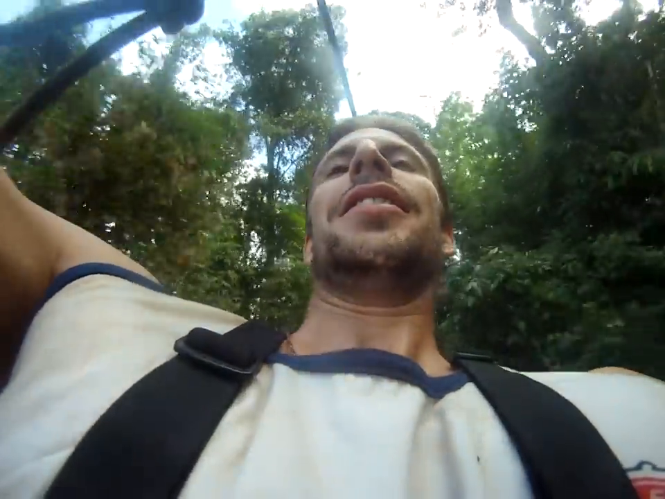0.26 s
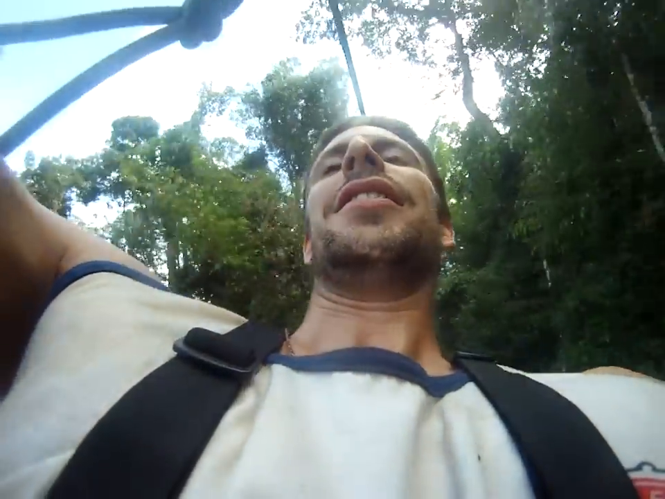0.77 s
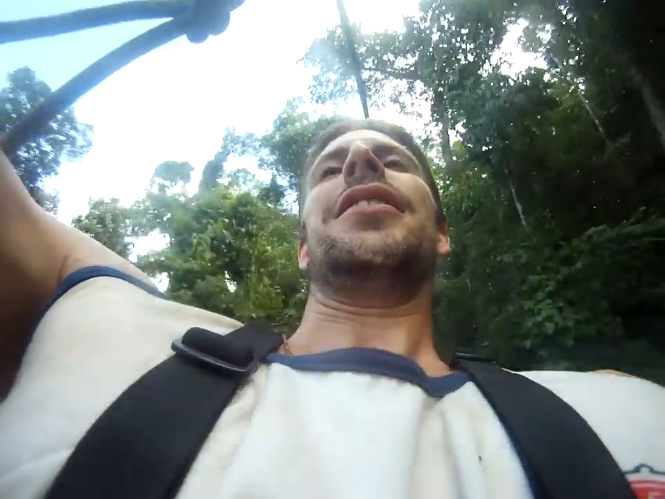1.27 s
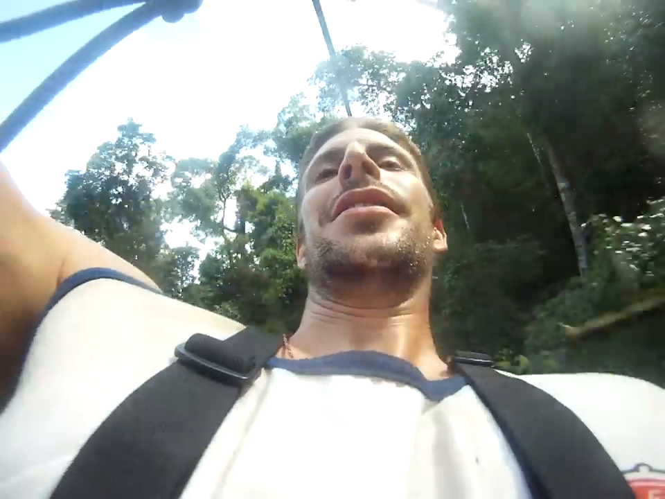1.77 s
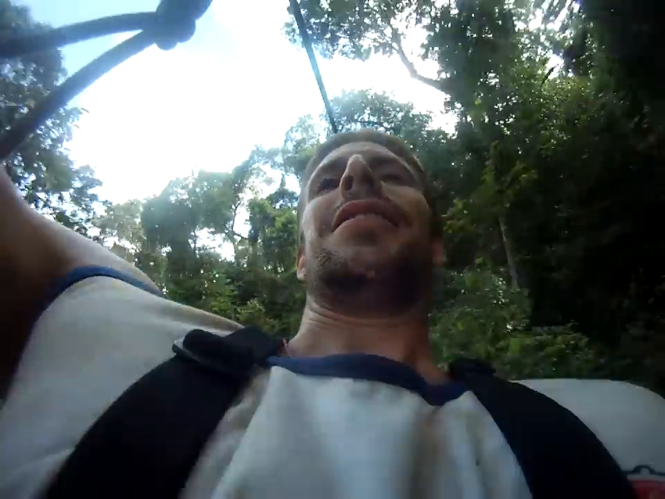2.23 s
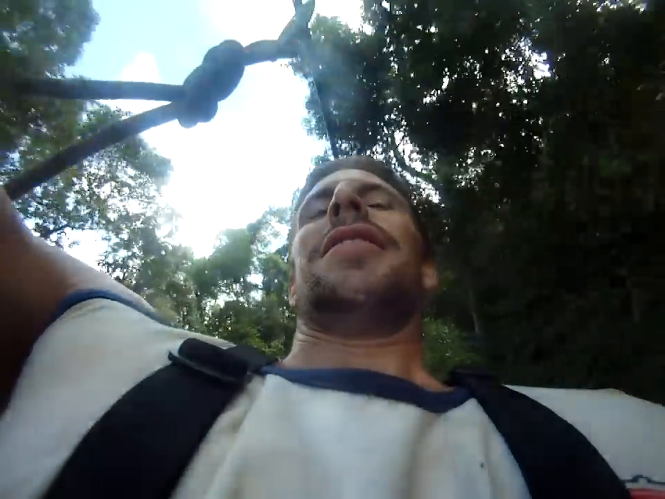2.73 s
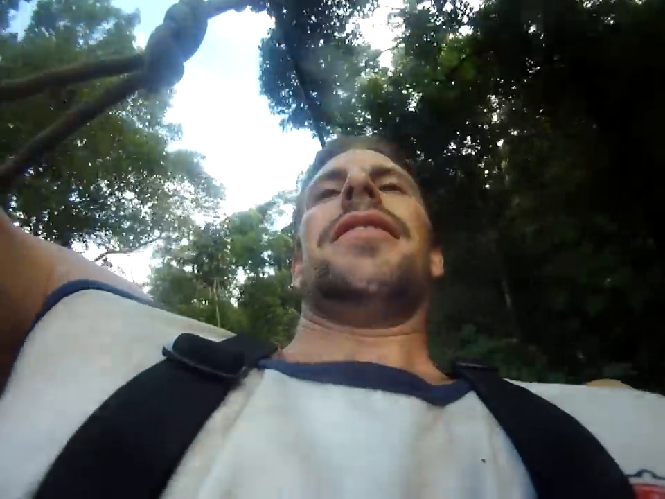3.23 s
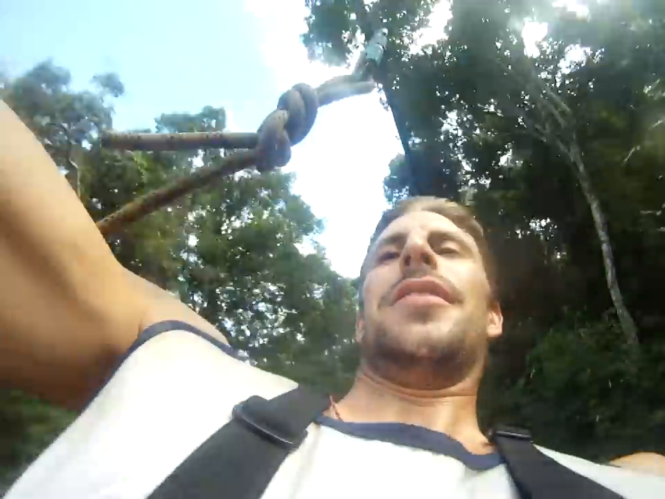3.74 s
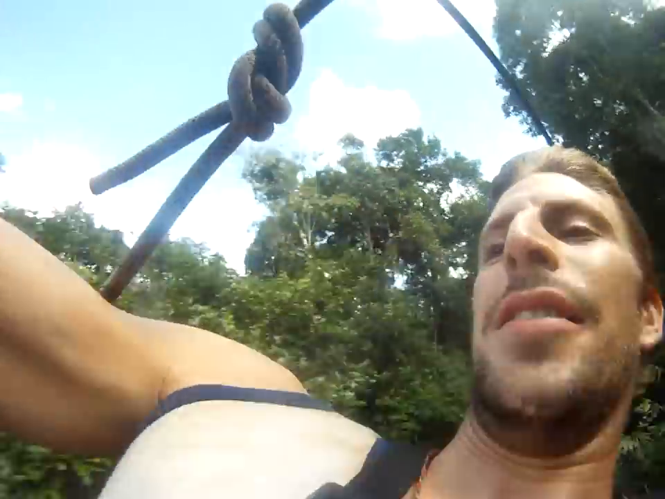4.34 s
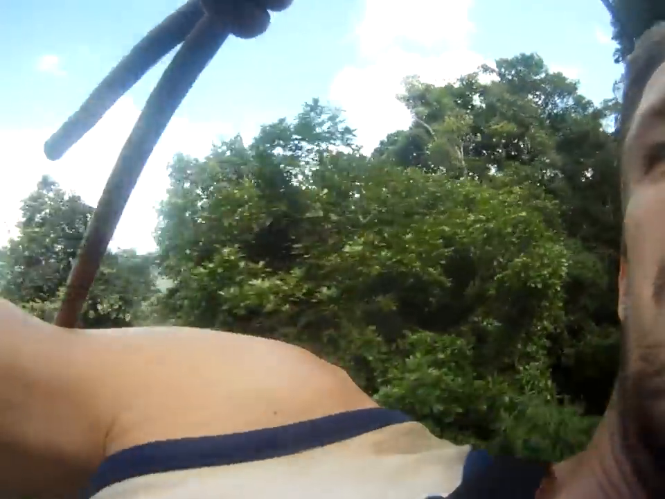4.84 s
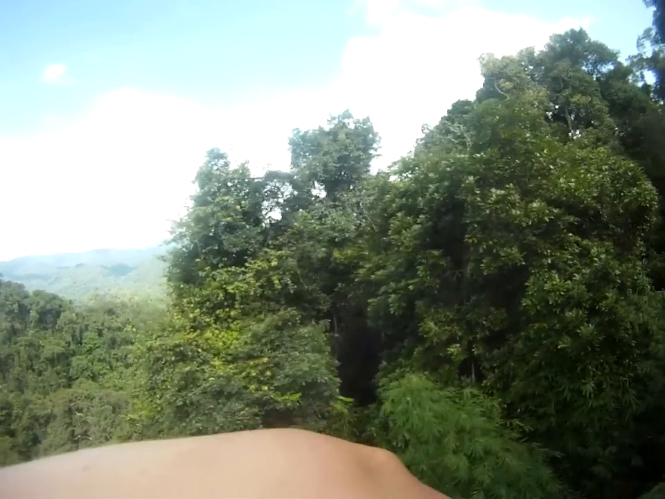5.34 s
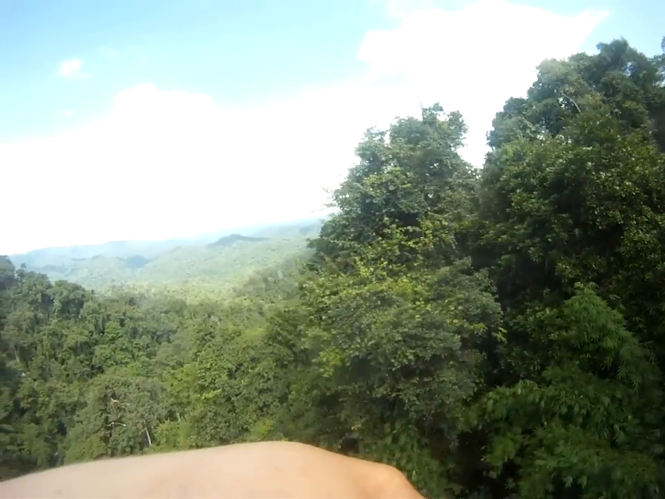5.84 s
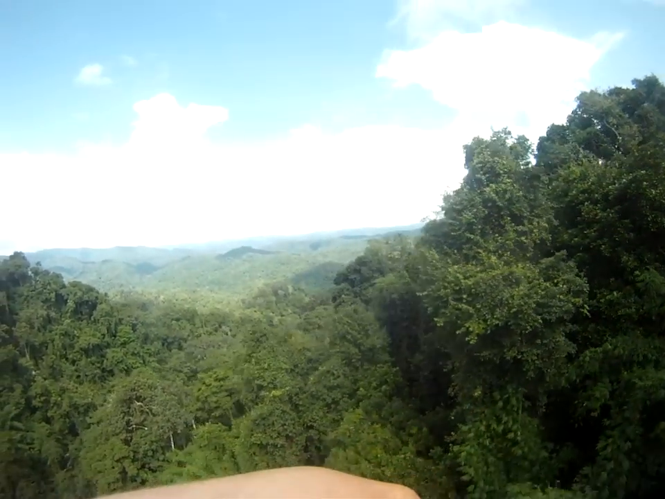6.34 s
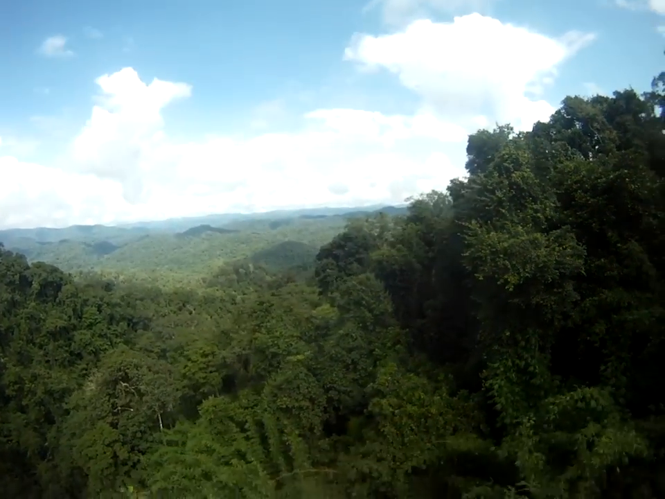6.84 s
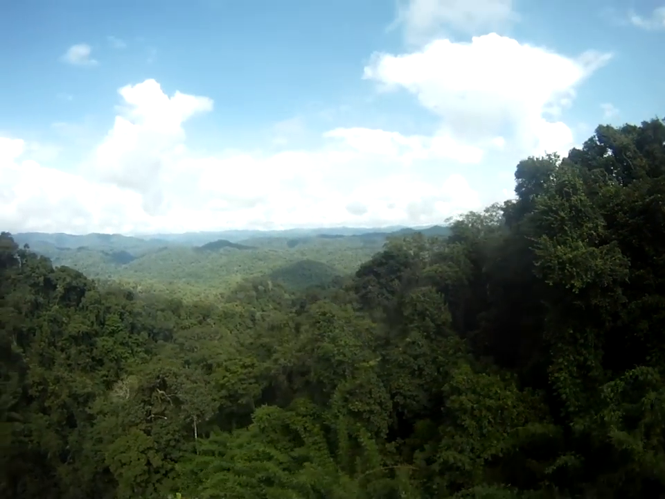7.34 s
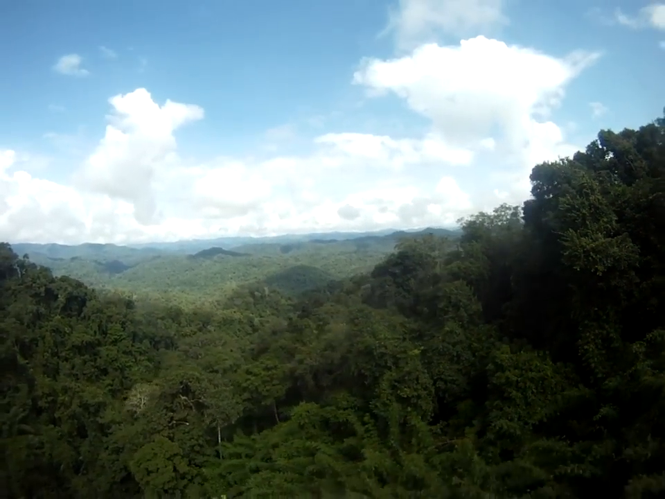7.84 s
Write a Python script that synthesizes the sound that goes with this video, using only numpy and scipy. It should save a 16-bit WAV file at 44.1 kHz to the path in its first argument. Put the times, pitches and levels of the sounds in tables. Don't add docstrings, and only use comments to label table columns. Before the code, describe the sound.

A pulley trolley whirs down a steel cable, its metallic whine climbing steadily, with wind rumbling on the microphone and sharp handling snaps midway.

```python
import sys
import numpy as np
from scipy import signal
from scipy.io import wavfile

SR = 44100
rng = np.random.default_rng(int(sys.argv[2]) if len(sys.argv) > 2 else 0)


def invert_db(x):
    u = np.asarray(x, float) / 20
    return 10 ** u


def file_out(sig):
    cols = np.atleast_2d(sig).T
    lim = np.clip(cols, -1, 1)
    pcm = np.round(lim * 32767).astype(np.int16)
    wavfile.write(sys.argv[1], SR, pcm)


N = 357210

# start_s, away (0 facing to 1 away)
TURN_AWAY = [(0, 0.05), (2, 0.057), (2.3, 0.13), (2.8, .1), (3.3, .2), (3.7, 0.69), (5.4, 1), (6, 1),
             (7, 0.66), (8.1, 0.53)]


def rolling(lay_turns, levels):
    # pitch_hz, width_hz, facing_db, away_db
    frame_modes = [(1499, 374, -4, -4.5), (1854, 240, -4.5, 0.5), (2050, 190, -24.5, 6),
                   (2282, 230, 2, 1.5), (2537, 70, -4.5, 2.5)]
    # pitch_hz, width_hz, facing_db, away_db
    upper_modes = [(3460, 360, 1.5, -8), (3672, 49, -25, 7), (3880, 170, 4, -7), (4170, 340, -5.5, 4)]
    # pitch_hz, width_hz, facing_db, away_db
    hiss_modes = [(4406, 180, -12.5, -11.5), (4650, 200, -7.5, -6.5), (4932, 150, -8, -7),
                  (5290, 430, -3.5, 2.5), (5666, 290, 4.5, -3)]
    frame_db, ring_hz, ring_db, upper_db, hiss_db = levels
    lay_pulse = 1 + 0.05 * np.cos(2 * np.pi * lay_turns)
    load = lay_pulse * invert_db(0.41 * drift(36) + 0.5 * drift(11.3))
    ring_gain = invert_db(ring_db - 2.0 + 0.36 * drift(31))
    out = ring_gain * wavering_line(np.cumsum(ring_hz) / SR, steady=0, blur_hz=192, swell_db=0) * load
    for modes, level_db in ((frame_modes, frame_db - 0.5), (upper_modes, upper_db + 2.0), (hiss_modes, hiss_db)):
        gain = invert_db(level_db + 0.86 * drift(6))
        out = out + gain * load * resonate(rng.standard_normal(N), modes)
    return out


def singing(whine_hz, strand_hz, levels):
    # start_s, level_db
    whine_knots = [(.05, -29), (.9, -25), (1.1, -34), (1.44, -31), (1.62, -21), (1.85, -29), (2.3, -39),
                   (2.7, -34), (3.5, -26), (3.9, -46), (4.8, -39), (5.2, -30), (5.66, -24), (5.9, -32),
                   (6.66, -30), (7.15, -34), (7.7, -25), (7.85, -38)]
    strong_multiples = [22, 24, 25, 27, 28]
    strong_rest_db = [-40, -34, -32, -36, -42]
    # centre_s, length_s, change_db
    strong_flares = [
        [(.05, .12, 11), (1.4, .35, 12), (2.07, .3, 20), (2.5, .12, 13), (3.2, .3, 14), (4.3, .1, 9),
         (7.45, .25, 8)],
        [(.68, .15, 12), (1.65, .15, 12), (2.6, .35, 7), (4.1, .3, -8), (5.1, .35, 9), (6.9, .4, 5)],
        [(.55, .3, 13), (2.55, .3, 8), (3.28, .15, 10), (4.0, .42, 16.5), (4.55, .1, 9), (4.95, .2, 8),
         (7.0, .25, -5)],
        [(1.1, .3, 11), (2.6, .27, 15), (3.65, .45, 16), (4.9, .12, 9), (6.2, .25, 7), (7.4, .7, 4)],
        [(2.5, .12, 14), (3.5, .75, 14), (6.1, .1, 8), (7.5, .75, 11)],
    ]
    weak_multiples = [21, 23, 26]
    weak_below_db = [-7, -8, -3]
    _, ring_hz, ring_db, upper_db, _ = levels
    whine_db, = joined([whine_knots])
    strong_db = [rest_db + swells(rows) for rest_db, rows in zip(strong_rest_db, strong_flares)]
    slipping_hz = strand_hz * (1 + 0.0025 * drift(2.5))
    lay_turns = np.cumsum(slipping_hz) / SR
    out = invert_db(whine_db) * wavering_line(np.cumsum(whine_hz) / SR, steady=0.8, blur_hz=7, swell_db=0)
    for multiple, level_db in zip(strong_multiples, strong_db):
        out = out + invert_db(level_db) * wavering_line(multiple * lay_turns, steady=0.5, blur_hz=23, swell_db=1.5)
    for multiple, below_db in zip(weak_multiples, weak_below_db):
        line_hz = multiple * strand_hz
        near = invert_db(ring_db) / (1 + ((line_hz - ring_hz) / 170) ** 2)
        near = near + invert_db(upper_db + 0.5) / (1 + ((line_hz - 3650) / 220) ** 2)
        line = wavering_line(multiple * lay_turns, steady=0.48, blur_hz=23, swell_db=2)
        out = out + near * invert_db(below_db) * line
    return out


def roll_levels(whine_hz):
    # start_s, load_db, grit_db (at the port)
    load_knots = [(0, -20.5, -25), (.6, -17.5, -22.5), (1.24, -23, -24), (1.72, -19, -23.5),
                  (2, -21.5, -25), (2.3, -18, -18.5), (2.7, -22, -23), (3.25, -19, -22.5), (3.8, -24, -19),
                  (4.5, -21, -15.5), (5, -19.5, -19), (5.25, -23, -18), (5.45, -22, -28), (5.95, -24, -27),
                  (6.7, -16.5, -21), (7.12, -17.5, -25), (7.61, -15.5, -21), (8.1, -18.5, -23)]
    # centre_s, length_s, change_db
    hand_shade = [
        (4.45, .3, -10),
        (5.3, .15, -4),
        (8.1, .2, 3),
    ]
    ring_facing_hz, ring_away_hz = 3075, 2825
    frame_facing_db, frame_away_db = -26, -28.5
    rest_db, peak_db = -31, 8
    best_hz, rise_hz, fall_hz = 1760, 130, 35
    load_db, grit_db = joined([load_knots])
    load_change_db, grit_change_db = load_db - load_db.mean(), grit_db - grit_db.mean()
    away = np.clip(joined([TURN_AWAY])[0], 0, 1)
    turned = 0.5 + 0.5 * np.tanh((away - 0.45) / 0.12)
    ring_hz = ring_facing_hz + (ring_away_hz - ring_facing_hz) * turned + 12 * drift(2.5)
    frame_db = frame_facing_db + (frame_away_db - frame_facing_db) * turned
    frame_db = frame_db + 0.25 * load_change_db + 0.35 * grit_change_db
    detune = (whine_hz - best_hz) / np.where(whine_hz < best_hz, rise_hz, fall_hz)
    upper_db = rest_db + peak_db * np.exp(-detune ** 2) + 0.3 * grit_change_db + swells(hand_shade)
    return frame_db, ring_hz, load_db, upper_db, grit_db


def handling():
    # start_s, peak_db, pitch_hz, t60_s, rattle (0-1)
    snaps = [(4.4322, 6, 2300, 0.022, 0.5), (4.4353, 22, 3670, 0.01, 0.11),
             (4.4374, 9.5, 2140, 0.014, 0.36), (4.4317, -20, 1490, 0.0098, 0.1),
             (4.6259, 15.5, 3620, 0.0062, 0.05), (4.6267, 17, 2260, 0.012, 0.16),
             (4.6268, 5, 780, 0.013, 0.1), (5.0189, 10.5, 2180, 0.011, 0.32), (5.0189, -2, 900, 0.012, 0.9),
             (5.0192, 8, 1500, .009, .5), (5.0187, -10, 262, 0.027, 0.5), (4.629, -4, 220, 0.023, 0.16),
             (5.4225, 4.5, 292, 0.011, 0.2), (5.4206, 17.5, 3720, 0.009, .12),
             (5.4193, 6, 1940, 0.0083, 0.58), (5.4222, 8, 1095, 0.01, 0.34), (5.4229, 8, 2350, 0.018, 0.7)]
    # start_s, peak_db, pitch_hz, overtone_db
    knocks = [(3.186, -17, 1500, -17), (3.343, -23, 880, -26), (3.354, -21, 740, -30),
              (3.424, -23, 730, -35), (3.471, -27, 735, -30), (3.501, -40, 1100, -23),
              (3.668, -26, 942, -30), (3.758, -22, 1040, -25), (3.958, -25, 940, -35),
              (4.087, -35, 1390, -27), (5.605, -29, 970, -20), (5.908, -7, 1100, -7.5),
              (5.92, -9.5, 1080, -15), (5.932, -16, 1130, -10), (5.951, -15, 966, -11),
              (5.965, -17, 930, -21), (5.996, -14, 925, -15), (6.016, -19, 920, -34),
              (6.041, -32, 484, -25), (6.053, -12, 990, -5), (6.916, -11, 850, -25), (7.051, -25, 570, -17),
              (7.059, -16, 1120, -13), (7.074, -24, 1140, -7), (7.083, -33, 624, -20),
              (7.097, -15.5, 514, -23), (7.16, -34, 923, -19), (7.886, -13.5, 980, -14)]
    # start_s, peak_db
    thumps = [(3.351, -11.5), (3.755, -9.5), (3.955, -7.5), (5.901, -9), (5.913, -12), (5.96, -10),
              (5.97, -5), (6.013, -7.5), (7.08, 0), (7.157, -15.5), (7.883, -8.5)]
    out = np.zeros(N)
    for start_s, peak_db, pitch_hz, t60_s, rattle in snaps:
        strike(out, start_s, peak_db, pitch_hz, t60_s, rattle)
    for start_s, peak_db, pitch_hz, overtone_db in knocks:
        strike(out, start_s, peak_db + 4.5, pitch_hz, t60_s=0.015, rattle=0.35)
        strike(out, start_s, overtone_db + 2.5, 1.9 * pitch_hz, t60_s=0.01, rattle=0.5)
    for start_s, peak_db in thumps:
        strike(out, start_s, peak_db, 110, t60_s=0.04, rattle=0)
    return out


def rubbing():
    # start_s, length_s, level_db
    rubs = [
        (3.2, .22, -42),
        (3.423, 0.06, -38),
        (5.89, 0.02, -34),
        (5.953, 0.03, -27),
        (7.042, 0.056, -22),
        (7.154, 0.028, -30),
    ]
    t = np.arange(N) / SR
    strokes = 0
    for start_s, length_s, level_db in rubs:
        edge_s = np.minimum(t - start_s, start_s + length_s - t)
        strokes = strokes + invert_db(level_db) * np.clip(edge_s / 0.004, 0, 1)
    grains = rng.standard_normal(N) * invert_db(5.0 * drift(150))
    skin = signal.butter(2, [450, 2400], "band", fs=SR, output="sos")
    return strokes * rms_one(signal.sosfilt(skin, grains))


def wind():
    # start_s, level_db
    wind_knots = [(0, -41), (.3, -41), (.7, -40), (1.1, -34.5), (1.66, -37), (2.2, -36.5), (2.5, -39),
                  (3.1, -31), (3.5, -29), (4.25, -33), (4.7, -33), (5.1, -37), (5.35, -31), (5.75, -30),
                  (6.6, -24.5), (7.3, -24.5), (7.7, -29), (8.1, -35)]
    # centre_s, length_s, change_db
    gusts = [(.3, .1, 5), (.66, .1, 6), (1.19, .2, 2), (2.44, .1, -8), (3.3, .15, 9), (3.9, .2, -3),
             (4.97, .1, 5), (5.35, .2, 5), (6.22, .12, 8), (6.37, .04, -10), (6.7, .25, -4),
             (8.02, .15, 13)]
    # pitch_hz, width_hz, facing_db, away_db
    cavity_modes = [(693, 76, -6, -9), (973, 410, 0, 6.5), (460, 900, -7, 1.5), (1190, 230, 0.5, -22)]
    buffet_db, = joined([wind_knots])
    strength_db = buffet_db + 33
    rumble_db = -30.5 + 0.9 * strength_db + swells(gusts)
    rush_db = -43 + 0.5 * strength_db
    white = rng.standard_normal((3, N + SR))
    rumble_band = signal.butter(2, [24, 80], "band", fs=SR, output="sos")
    buffet_band = signal.butter(1, [80, 150], "band", fs=SR, output="sos")
    buffet_top = signal.butter(2, 240, fs=SR, output="sos")
    rumble = signal.sosfilt(rumble_band, white[0])[SR:]
    buffet = signal.sosfilt(buffet_top, signal.sosfilt(buffet_band, white[1]))[SR:]
    buffet = buffet * invert_db(1.73 * drift(11.3))
    rush = resonate(white[2, SR:], cavity_modes) * invert_db(1.1 * drift(23))
    return invert_db(rumble_db) * rms_one(rumble) + invert_db(buffet_db) * rms_one(buffet) + invert_db(rush_db) * rush


def resonate(x, modes):
    away = np.clip(joined([TURN_AWAY])[0], 0, 1)
    out, power = 0, 0
    for k, (pitch_hz, width_hz, facing_db, away_db) in enumerate(modes):
        r = np.exp(-np.pi * width_hz / SR)
        b, a = [1, 0, -0.987], [1, -2 * r * np.cos(2 * np.pi * pitch_hz / SR), r * r]
        gain = invert_db(facing_db + away * (away_db - facing_db))
        shifted = np.roll(x, 7919 * k)
        ring = signal.lfilter(b, a, signal.lfilter(b, a, shifted))
        out = out + gain * rms_one(ring)
        power = power + gain ** 2
    return out / np.sqrt(power)


def wavering_line(turns, steady, blur_hz, swell_db):
    blur = drift(blur_hz) + 1j * drift(blur_hz)
    shape = steady + (1 - steady) * blur
    tone = np.real(shape * np.exp(2j * np.pi * turns))
    return rms_one(tone * invert_db(swell_db * drift(6)))


def strike(out, start_s, peak_db, pitch_hz, t60_s, rattle):
    t = np.arange(int(0.04 * SR)) / SR
    stumble = rattle * pitch_hz / 5000 * np.cumsum(rng.standard_normal(len(t)))
    at = round(start_s * SR)
    out[at:at + len(t)] -= invert_db(peak_db - 60 * t / t60_s) * np.sin(2 * np.pi * pitch_hz * t + stumble)


def swells(rows):
    t = np.arange(N) / SR
    return sum(db * np.exp(-((t - centre_s) / length_s) ** 4) for centre_s, length_s, db in rows)


def drift(rate_hz):
    r = np.exp(-2 * np.pi * rate_hz / SR)
    return rms_one(signal.lfilter([1], [1, -2 * r, r * r], rng.standard_normal(N + SR))[SR:])


def joined(spans):
    knots_s, *columns = np.transpose(np.vstack(spans))
    return [np.interp(np.arange(N) / SR, knots_s, column) for column in columns]


def rms_one(x):
    return x / np.sqrt(np.mean(np.abs(x) ** 2) + 1e-20)


def scene():
    # start_s, whine_hz (bearing)
    speed_knots = [(0.0, 1383), (0.54, 1468), (0.81, 1496), (1.35, 1562), (1.89, 1601), (2.16, 1627),
                   (2.43, 1660), (2.7, 1682), (3.51, 1737), (4.05, 1768), (4.59, 1778), (5.13, 1804),
                   (5.67, 1813), (7.29, 1813), (7.56, 1805), (8.1, 1801)]
    whine_hz, = joined([speed_knots])
    strand_hz = whine_hz / 11.862
    levels = roll_levels(whine_hz)
    trolley = rolling(np.cumsum(strand_hz) / SR, levels) + singing(whine_hz, strand_hz, levels)
    return (trolley + wind() + handling() + rubbing())[None]


def roll_off(x):
    return signal.sosfilt(signal.butter(12, 16110, fs=SR, output="sos"), x)


def record(dry):
    held_hz, cut_hz = 12000, 15380
    release_db_per_s, lag_s, delay_s = 95, 0.0012, 0.003
    t = np.arange(N) / SR
    over_db = np.maximum(20 * np.log10(np.abs(dry[0]) + 1e-9) - 1.5, 0)
    duck_db = np.maximum.accumulate(over_db + release_db_per_s * t) - release_db_per_s * t
    lag = np.exp(-1 / (lag_s * SR))
    smooth_db = signal.lfilter([1 - lag], [1, -lag], duck_db)
    late_db = np.interp(t - delay_s, t, smooth_db)
    x = np.clip(dry[0] * invert_db(-late_db), -1.5, 1.1)
    x = signal.sosfilt(signal.butter(1, 25, "high", fs=SR, output="sos"), x)
    x = signal.sosfiltfilt(signal.butter(8, 5830, fs=SR, output="sos"), x)
    coarse = np.clip(signal.resample(x, N * held_hz // SR), -0.95, 0.95)
    held = np.roll(np.repeat(coarse, 4), -2)
    held = signal.resample(held, N)
    held = signal.sosfiltfilt(signal.ellip(12, 0.3, 40, cut_hz - 80, fs=SR, output="sos"), held)
    return roll_off(np.clip(held, -1, 1)[None])


dry = scene()
out = record(dry)
file_out(out)
```